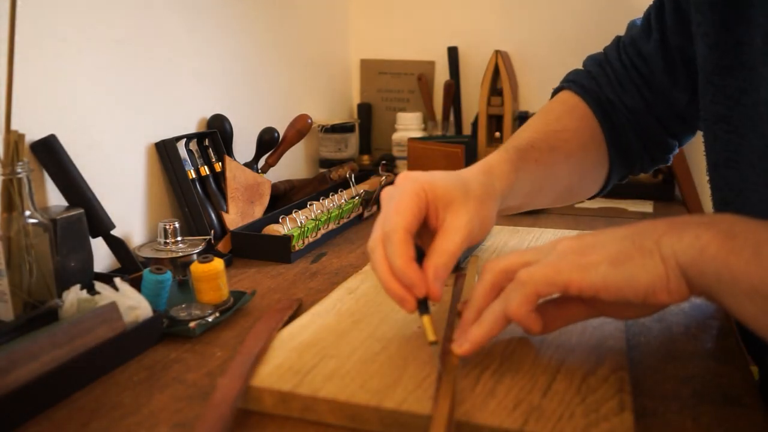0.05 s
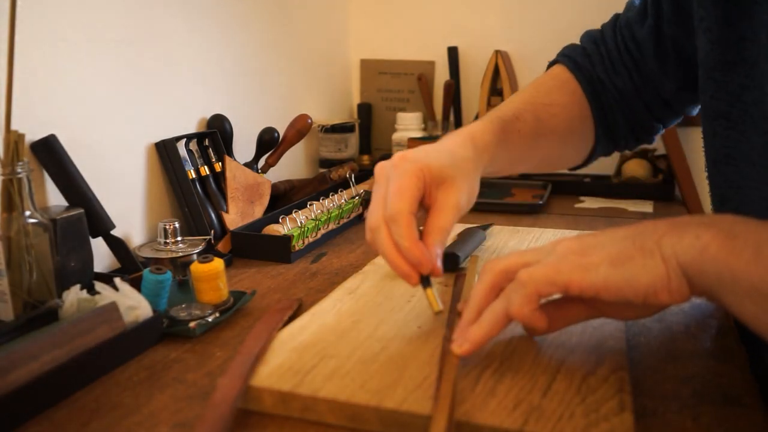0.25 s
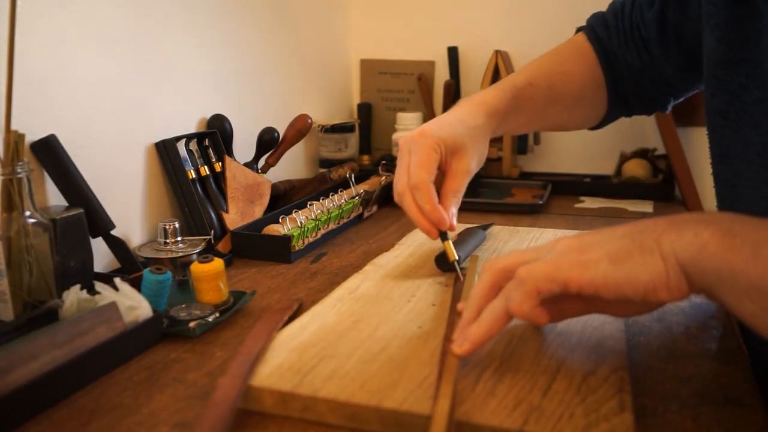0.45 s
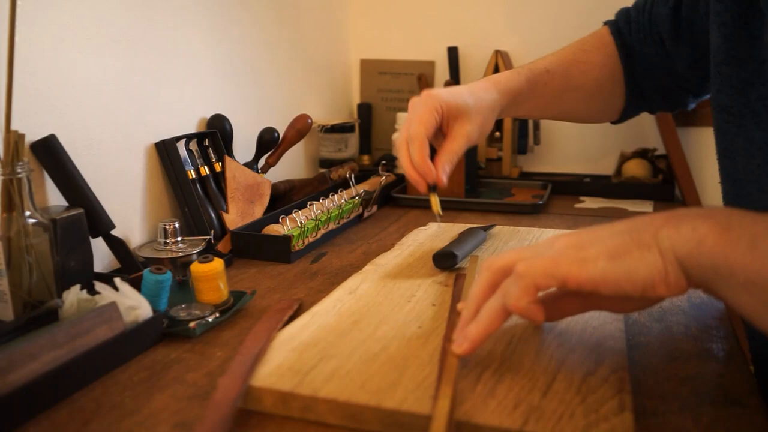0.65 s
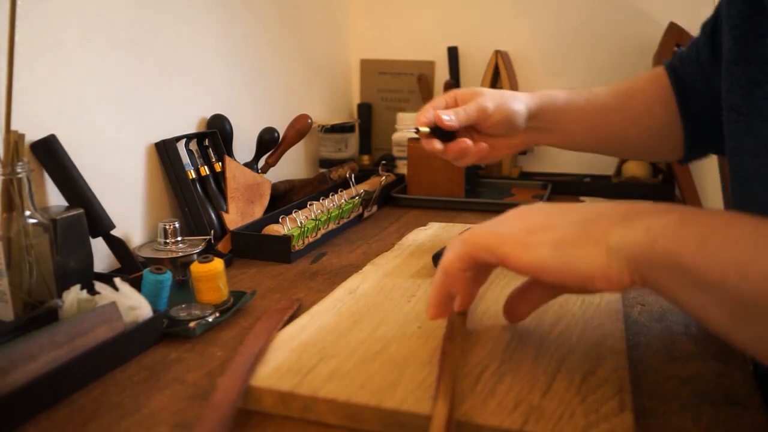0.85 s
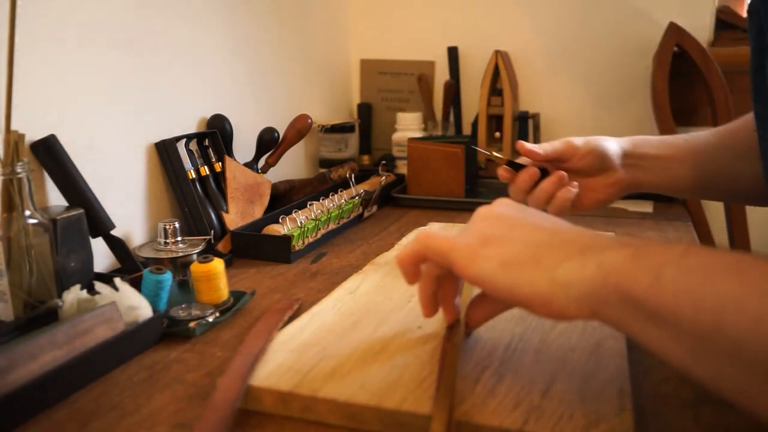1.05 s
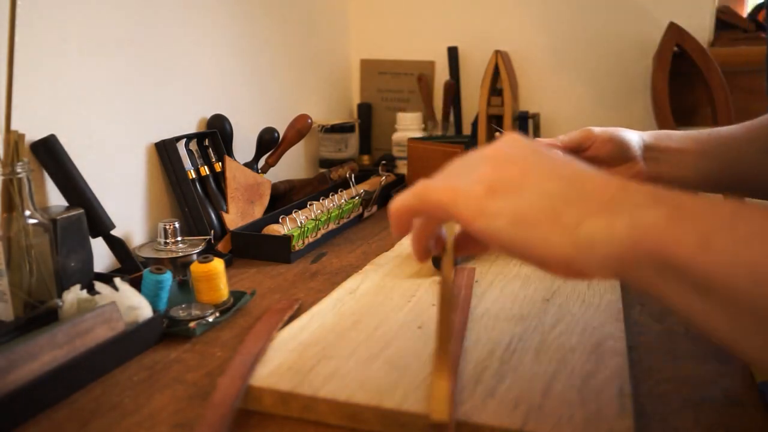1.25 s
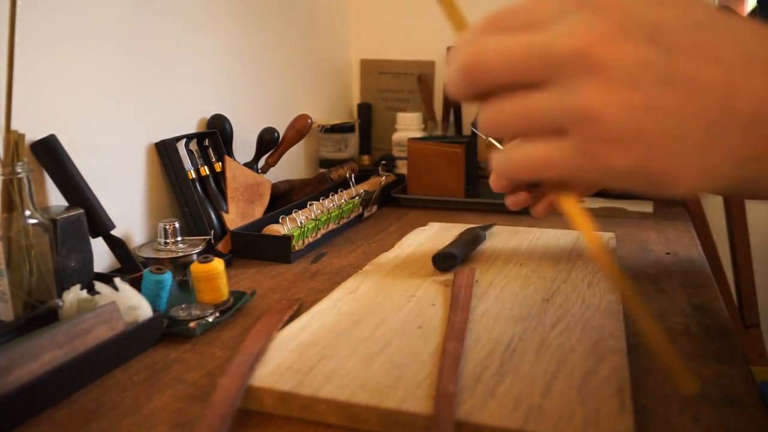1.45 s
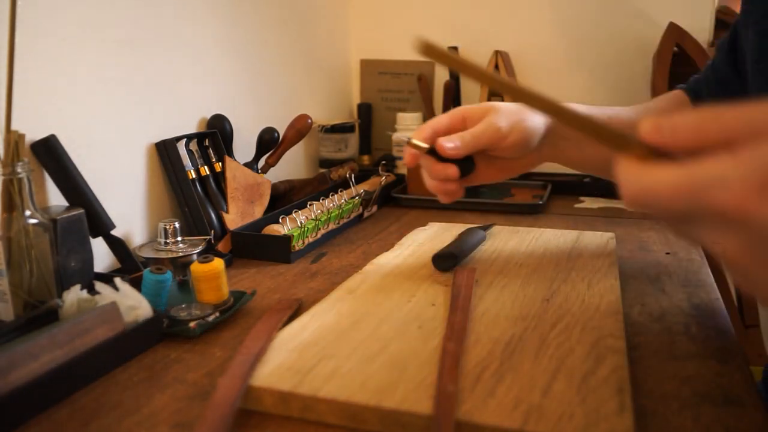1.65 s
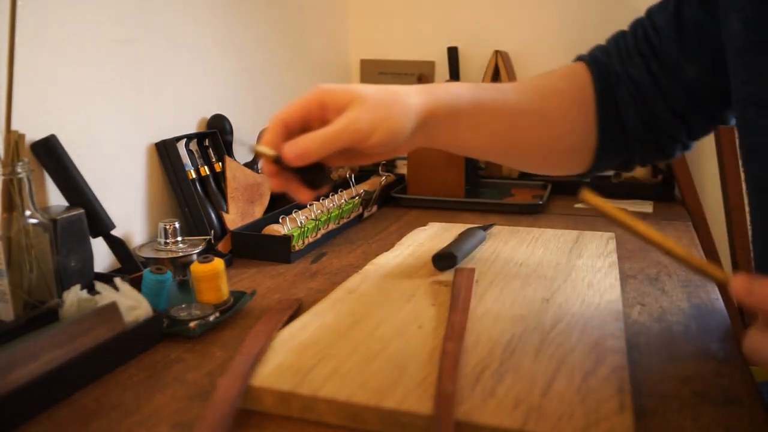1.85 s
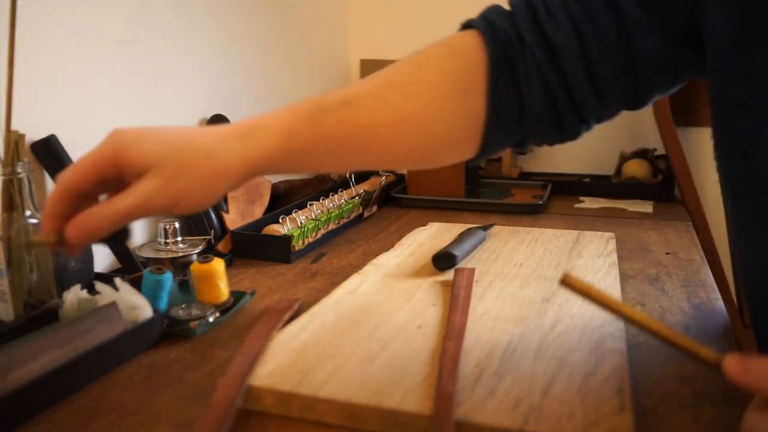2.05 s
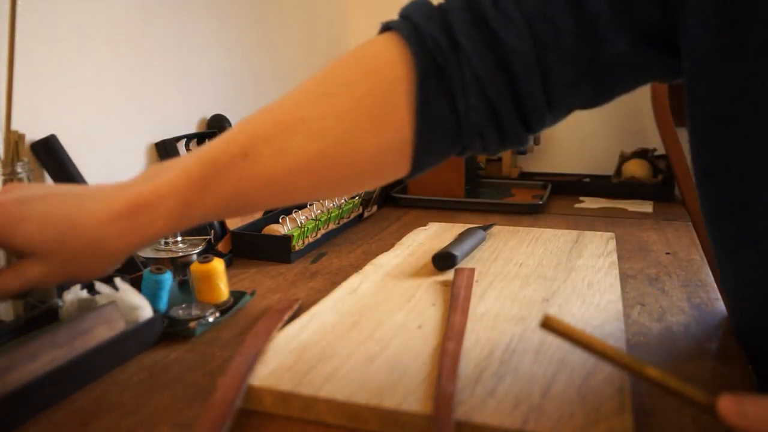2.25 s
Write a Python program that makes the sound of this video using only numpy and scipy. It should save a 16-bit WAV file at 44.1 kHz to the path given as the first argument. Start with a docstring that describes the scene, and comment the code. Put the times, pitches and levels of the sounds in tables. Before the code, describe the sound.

A small blade scrapes along a leather strap from 0.2 to 0.65 seconds, crackling densely as the wooden board drones beneath. It squeals thinly near 0.4 and clicks off the end at 0.6. Fingers bump the board dully until about 1 second. A sharp tool click comes at 1.5, a soft sleeve rustle around 1.7, and fainter clicks near 2. Low hum and rumble continue throughout in a small room.

```python
"""A low hum and patchy handling rumble run throughout. A small blade is pushed once along a leather strap
on a wooden board: board and bench drone under the stroke while fibres part in a dense crackle. Midway the
edge squeals thinly, then the blade snaps off the end with a click. Fingers bump the board and the strap
is lifted. Last, a sleeve rustles and tools click at the bench, in a small room."""
import sys
import numpy as np
from scipy import signal
from scipy.fft import rfft, irfft, next_fast_len
from scipy.io import wavfile

SR = 44100
rng = np.random.default_rng(int(sys.argv[2]) if len(sys.argv) > 2 else 0)


def waveform_to_disk(signal):
    """Save audio, clipped to [-1, 1], as 16-bit WAV at the path in sys.argv[1]."""
    frames = np.transpose(np.atleast_2d(signal))
    scaled = np.clip(frames, -1, 1) * 32767
    samples = np.round(scaled).astype(np.int16)
    wavfile.write(sys.argv[1], SR, samples)


N = 105840


def amp(db):
    """Decibels to gain."""
    return 10 ** (np.asarray(db) / 20)


def unit_rms(x):
    """x scaled to rms 1."""
    return x / np.sqrt(np.mean(x ** 2) + 1e-20)


def curve_db(rows):
    """Level per sample from (s, dB) rows; silent before and after."""
    times_s, levels_db = np.transpose(rows)
    return np.interp(np.arange(N) / SR, times_s, levels_db, left=-120, right=-120)


def at_hz(points, hz):
    """(Hz, value) points interpolated on a log frequency axis."""
    points_hz, values = np.transpose(points)
    return np.interp(np.log(hz + 1), np.log(points_hz + 1), values)


def filtered(x, response):
    """x times a complex response of frequency."""
    size = next_fast_len(x.shape[-1] + SR // 2)
    hz = np.fft.rfftfreq(size, 1 / SR)
    return irfft(rfft(x, size) * response(hz), size)[..., :x.shape[-1]]


def shaped(x, response):
    """x through a response scaled to keep the power of white noise."""
    return filtered(x, lambda f: response(f) / np.sqrt(np.mean(np.abs(response(f)) ** 2)))


def coloured(x, spectrum):
    """x shaped by (Hz, relative dB) points."""
    return shaped(x, lambda f: amp(at_hz(spectrum, f)))


def resonant(x, modes):
    """x through parallel resonances of alternating sign."""
    def response(f):
        return sum((-1) ** k * amp(db) * 1j * f * width_hz / (hz * hz - f * f + 1j * f * width_hz)
                   for k, (hz, width_hz, db) in enumerate(modes))
    return shaped(x, response)


def lowpass_gain(hz, edge_hz):
    """Falls 24 dB per octave above the edge."""
    return 1 / (1 + (hz / edge_hz) ** 4)


def decay(t, t60_s):
    """Falls 60 dB in t60_s."""
    return np.exp(-np.log(1000) * t / t60_s)


def ringing(modes, t):
    """Damped modes struck at once."""
    return sum(amp(db) * decay(t, t60_s) * np.sin(2 * np.pi * hz * t) for hz, db, t60_s in modes)


def add(track, start_s, x):
    """Mix x into the track."""
    i = round(start_s * SR)
    track[i:i + len(x)] += x[:N - i]


def grains(rate_per_s=11000, spread_db=4):
    """Tiny tears at random moments, a few much larger than the rest."""
    impulses = (rng.random(N) < rate_per_s / SR) * rng.choice([-1, 1], N)
    return unit_rms(impulses * amp(spread_db * rng.standard_normal(N)))


# Near reflections. Each row: frequency in Hz, gain in dB.
SCATTER_GAIN = [(400, -17), (900, -10), (2000, -8), (6000, -3), (15000, -2)]

def scattered(x, t60_s=0.025):
    """Nearby surfaces throw back a brief echo, opposite in sign left and right."""
    t = np.arange(SR // 50) / SR
    echo = rng.standard_normal(len(t)) * decay(t, t60_s) * np.sqrt(t)
    reflected = np.convolve(x, echo / np.linalg.norm(echo))[:N]
    side = filtered(reflected, lambda f: amp(at_hz(SCATTER_GAIN, f)))
    return np.array([side, -side])


# Room decay. Each row: frequency in Hz, t60 in seconds.
ROOM_T60 = [(100, 0.083), (400, 0.21), (2000, 0.31), (6000, 0.24), (15000, 0.18)]

def in_room(x, room_db, pan_db=0, spill=None, build_s=0.0072):
    """Direct sound, near reflections and a tail fed by x or its off-axis spill; pan is left over right."""
    hz, t, noise = signal.stft(rng.standard_normal((2, SR // 2)), SR, nperseg=256)
    envelope = decay(t, at_hz(ROOM_T60, hz)[:, None]) * (1 - np.exp(-t / build_s))
    _, tail = signal.istft(noise * envelope, SR, nperseg=256)
    feed = x if spill is None else spill
    wet = signal.fftconvolve(feed[None], tail / np.linalg.norm(tail[0]), axes=1)[:, :N]
    return (x + scattered(x) + amp(room_db) * wet) * amp([[pan_db / 2], [-pan_db / 2]])


# Handling rumble. Each row: time in seconds, level in dB.
RUMBLE_LEVEL = [(0, -53.5), (.07, -47.5), (.25, -46), (1.05, -49), (1.25, -54), (1.45, -49), (1.8, -51.5),
                (2.0, -48.5), (2.41, -50)]
# Rumble and hiss spectra. Each row: frequency in Hz, relative level in dB.
RUMBLE_SPECTRUM = [(20, -8), (45, 0.5), (65, -1.5), (95, -7), (125, -4.5), (160, 1.5), (205, -2), (265, -3),
                   (330, -11), (450, -12.5), (700, -26), (1500, -36)]
HISS_SPECTRUM = [(200, -3), (600, 3), (1000, 2), (2000, -1), (4000, -3.5), (8000, -4.5), (15500, -8.5)]

def background(mains_hz=49.6, mains_db=-56.5, hiss_db=-50):
    """Low mains hum and steady hiss, with patchy handling rumble that swells and dips."""
    noise = rng.standard_normal(N) + 0.3 * rng.standard_normal((2, N))
    rumble = amp(curve_db(RUMBLE_LEVEL)) * coloured(noise, RUMBLE_SPECTRUM)
    mains = amp(mains_db) * np.sqrt(2) * np.sin(2 * np.pi * mains_hz * np.arange(N) / SR)
    hiss = amp(hiss_db) * coloured(rng.standard_normal((2, N)), HISS_SPECTRUM)
    return rumble + mains + hiss


# Board ring and bench drone. Each row: time in seconds, level in dB.
BOARD_LEVEL = [(.235, -57), (.245, -50), (.3, -45), (.37, -38), (.42, -28), (.5, -30), (.565, -30.5),
               (.6, -36), (.655, -48), (.7, -63), (.73, -78)]
BENCH_LEVEL = [(.23, -48), (.27, -43), (.32, -34), (.38, -38), (.43, -38.5), (.52, -33.5), (.56, -32),
               (.6, -39), (.665, -35), (.7, -51), (.75, -57)]
# Wood resonances. Each row: frequency in Hz, width in Hz, relative level in dB.
BOARD_MODES = [(552, 14, 3), (600, 13, 0), (672, 18, -4), (722, 14, 0), (756, 16, 1), (790, 18, -5),
               (974, 22, -7), (1245, 22, -9), (1318, 20, -7)]
BENCH_MODES = [(211, 12, -1), (270, 9, 2), (303, 12, -5), (333, 12, -8), (439, 14, -4)]
# Broad noise bed under the drone. Each row: frequency in Hz, relative level in dB.
BED_SPECTRUM = [(40, -30), (75, -8), (105, -5), (150, -5.5), (210, -17), (350, 1), (600, -7), (950, -10),
                (1400, -32), (3000, -37)]

def board_drone(bed_db=-2):
    """The drag of the blade shakes the board and the bench under it."""
    bench_gain = amp(curve_db(BENCH_LEVEL))
    board = resonant(amp(curve_db(BOARD_LEVEL)) * grains(), BOARD_MODES)
    bench = resonant(bench_gain * grains(), BENCH_MODES)
    bed = amp(bed_db) * coloured(bench_gain * grains(), BED_SPECTRUM)
    return in_room(board, room_db=-8, pan_db=2) + in_room(bench + bed, room_db=-25)


# Tearing at the edge. Each row: time in seconds, level in dB.
CUT_LEVEL = [(.236, -51), (.24, -36.5), (.27, -35.5), (.315, -34.5), (.335, -30.5), (.385, -28.5),
             (.425, -28), (.495, -27.5), (.518, -23), (.545, -29.5), (.572, -27.5), (.6, -37), (.622, -38),
             (.652, -44.5), (.675, -68), (.71, -61)]
# Brightness of the cut. Each row: time in seconds, treble gain in dB.
CUT_TREBLE = [(.23, 0.5), (.33, 1.5), (.43, 3.5), (.52, 3.5), (.57, 1), (.72, 2)]
# Parting fibres. Each row: frequency in Hz, relative level in dB.
FIBRE_SPECTRUM = [(300, -10), (800, -2.5), (1300, -2), (1830, -5.5), (2400, 0), (3000, 0), (4800, -7),
                  (5700, -7), (7700, -10), (8600, -17), (11000, -18.5), (15500, -22.5)]
# Blade resonances. Each row: frequency in Hz, width in Hz, relative level in dB.
BLADE_MODES = [(2338, 30, 2), (2387, 30, 2), (2616, 30, 0), (2850, 60, -3), (3690, 90, -5), (4070, 40, -5),
               (4610, 120, -7), (5105, 40, -3), (6225, 60, -7), (6835, 30, -6)]
# Tough fibres snapping. Each row: start in seconds, level in dB.
FIBRE_SNAPS = [(0.337, -19), (0.473, -17.5), (0.4775, -17), (.5141, -11.5), (0.526, -22), (0.5582, -21)]
# Ring of a snap. Each row: frequency in Hz, relative level in dB, t60 in seconds.
FIBRE_SNAP_MODES = [(2422, -9, 0.044), (3160, -3, 0.0047), (4800, 2, 0.0042), (9000, -18, 0.00082)]

def cut(blade_db=-17, treble_hz=5940):
    """Fibres part at the edge and ring the blade; a few tough ones snap, and the edge squeals."""
    tears = amp(curve_db(CUT_LEVEL)) * grains()
    crackle = coloured(tears, FIBRE_SPECTRUM) + amp(blade_db) * resonant(tears, BLADE_MODES)
    lows = filtered(crackle, lambda f: lowpass_gain(f, treble_hz))
    crackle = lows + amp(curve_db(CUT_TREBLE)) * (crackle - lows)
    snap = ringing(FIBRE_SNAP_MODES, np.arange(SR // 20) / SR)
    for start_s, db in FIBRE_SNAPS:
        add(crackle, start_s, amp(db) * snap)
    squeals = sum(squeal(*row) for row in EDGE_SQUEALS)
    return in_room(crackle + squeals, room_db=-6.5, pan_db=-3)


# Hard tool contacts. Each row: start in seconds, level in dB, crack t60 in seconds, low and high edge
# in Hz, ring in Hz, ring in dB, ring t60 in seconds, knock in dB, pan in dB, room in dB.
TOOL_CLICKS = [(0.239, -29, 0.025, 1190, 7000, 1483, -5, 0.077, -12, -8.5, 2.5),
               (.628, -21, 0.01, 1600, 7400, 1930, -4.5, 0.059, -36, -2.5, -9.5),
               (0.644, -29, 0.019, 1500, 4430, 3450, -7, 0.038, -3, 2, -9),
               (1.5272, -21.5, 0.01, 1610, 8550, 4910, -3, 0.015, -11, -4, 0.5),
               (1.9517, -42, 0.013, 1300, 3800, 1695, 3.5, 0.047, -2, -6, -5),
               (2.0497, -38, 0.0083, 1600, 3800, 3420, -7, .03, -23, -2, -3),
               (2.168, -35.5, 0.025, 900, 5070, 616, -1, 0.025, -10, -5.5, 3)]
# Wooden handle. Each row: frequency in Hz, relative level in dB, t60 in seconds.
HANDLE_MODES = [(632, -3.5, 0.022), (1554, -5, 0.041)]
# What a contact radiates into the room. Each row: frequency in Hz, relative level in dB.
SPILL_SPECTRUM = [(250, -11), (600, -0.5), (1000, -4), (1600, 5), (3500, 0), (6000, 0), (9000, -3),
                  (10500, -8.5), (13000, -4), (15500, -7)]

def tool_clicks(attack_s=0.00015, crack_top_db=-20.5, direct_spill_db=-6):
    """Each contact is a short crack, one brief ring and a knock of the wooden handle."""
    out, t = np.zeros((2, N)), np.arange(SR // 5) / SR
    for (start_s, db, crack_t60_s, low_hz, high_hz,
         ring_hz, ring_db, ring_t60_s, knock_db, pan_db, room_db) in TOOL_CLICKS:
        def band(f):
            return f / np.hypot(f, low_hz) * (lowpass_gain(f, high_hz) + amp(crack_top_db))
        crack = shaped(rng.standard_normal(len(t)), band) * decay(t, crack_t60_s)
        ring = ringing([(ring_hz, ring_db, ring_t60_s)], t)
        knock = amp(knock_db) * ringing(HANDLE_MODES, t)
        onset = amp(db) * (1 - np.exp(-t / attack_s))
        direct, blow = np.zeros(N), np.zeros(N)
        add(direct, start_s, onset * (crack + ring + knock))
        add(blow, start_s, [np.linalg.norm(onset * decay(t, crack_t60_s))])  # impulse of equal energy
        spill = coloured(blow, SPILL_SPECTRUM) + amp(direct_spill_db) * direct
        out += in_room(direct, room_db, pan_db, spill)
    return out


# Mid-stroke squeals. Each row: centre and half length in seconds, pitch in Hz, rise in Hz per second,
# width in Hz, level in dB.
EDGE_SQUEALS = [(0.42, 0.039, 1325, 0, 60, -35), (0.443, 0.029, 7750, 5000, 350, -33.5)]

def squeal(centre_s, half_length_s, hz, rise_hz_per_s, width_hz, db):
    """A narrow wavering band swells and fades as the edge rubs."""
    t = np.arange(N) / SR - centre_s
    waver = unit_rms(filtered(rng.standard_normal(N), lambda f: np.exp(-np.square(f / width_hz))))
    swell = amp(db) * np.exp(-np.square(t / half_length_s))
    return swell * waver * np.sin(2 * np.pi * (hz * t + rise_hz_per_s * t * t / 2))


# Soft bumps on the board. Each row: start in seconds, level in dB.
BOARD_BUMPS = [(0.417, -29), (0.621, -26.5), (0.64, -28), (0.676, -34.5), (0.8296, -22.5), (0.841, -30.5),
               (.879, -37.5), (0.922, -38), (0.981, -35), (1.059, -48), (2.168, -40), (2.222, -45)]
# Thud of the board. Each row: frequency in Hz, relative level in dB, t60 in seconds.
THUD_MODES = [(81, -15.5, 0.18), (113, -1.5, .06), (206, -3, 0.099), (415, -14, 0.034)]
# Skin and leather meeting wood. Each row: frequency in Hz, relative level in dB.
PAT_SPECTRUM = [(200, -6), (500, 0.5), (900, 0), (1500, -10), (3000, -15.5), (8000, -27)]

def bumps(attack_s=0.0018, pat_db=-18, pat_t60_s=0.098):
    """Hand and strap knock dully on the board, each with a soft pat."""
    out, t = np.zeros(N), np.arange(SR // 4) / SR
    thud = (1 - np.exp(-t / attack_s)) * ringing(THUD_MODES, t)
    for start_s, db in BOARD_BUMPS:
        pat = amp(pat_db) * decay(t, pat_t60_s) * coloured(rng.standard_normal(len(t)), PAT_SPECTRUM)
        add(out, start_s, amp(db) * (thud + pat))
    return in_room(out, room_db=-25)


# Sleeve rustle. Each row: time in seconds, level in dB.
SLEEVE_LEVEL = [(1.3, -62.5), (1.48, -60.5), (1.62, -56), (1.7, -52), (1.8, -53.5), (1.9, -60.5),
                (2.1, -61.5), (2.4, -64)]
# Brushing cloth. Each row: frequency in Hz, relative level in dB.
CLOTH_SPECTRUM = [(200, 5), (600, -3), (1800, -1.5), (3500, -7), (7500, -14), (15000, -13)]

def sleeve():
    """Cloth brushes softly as the arm reaches across."""
    rustle = amp(curve_db(SLEEVE_LEVEL)) * coloured(grains(), CLOTH_SPECTRUM)
    return in_room(rustle, room_db=0, pan_db=-3.5)


def scene():
    """Everything at the bench, in stereo."""
    return background() + board_drone() + cut() + tool_clicks() + bumps() + sleeve()


def record(dry):
    """Nothing passes above the band limit."""
    return filtered(dry, lambda hz: hz < 15850)


dry = scene()
out = record(dry)
waveform_to_disk(out)
```